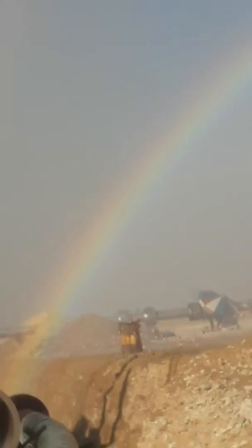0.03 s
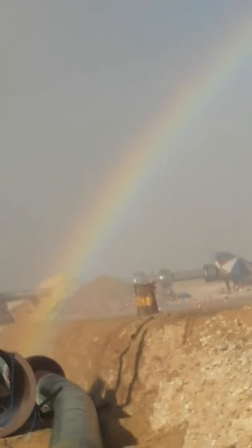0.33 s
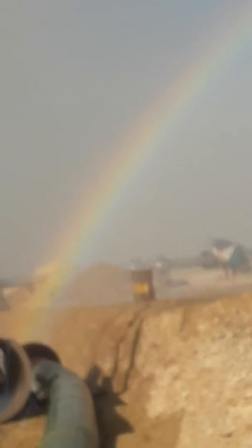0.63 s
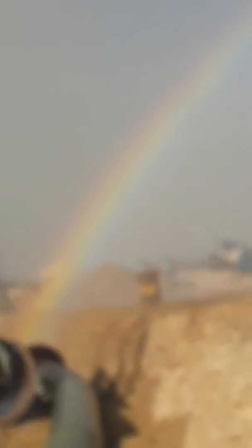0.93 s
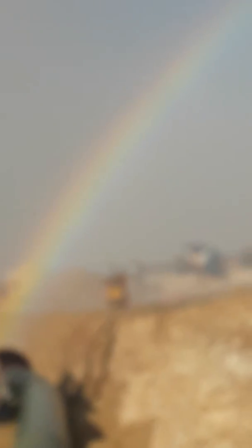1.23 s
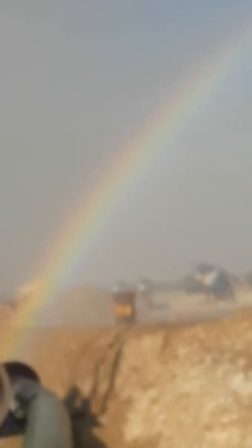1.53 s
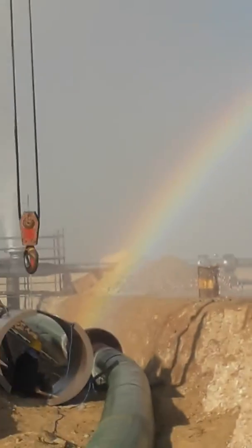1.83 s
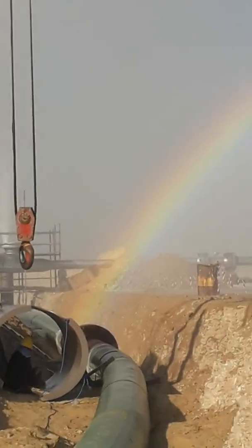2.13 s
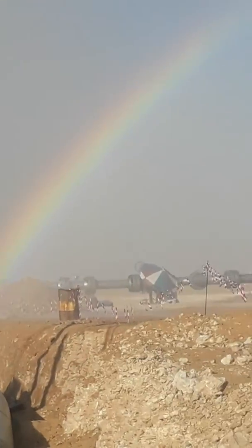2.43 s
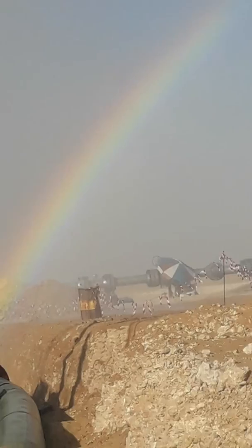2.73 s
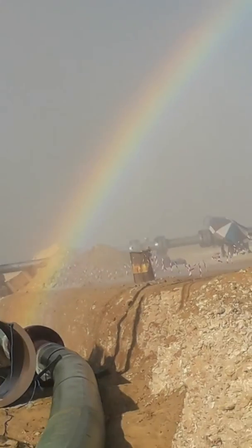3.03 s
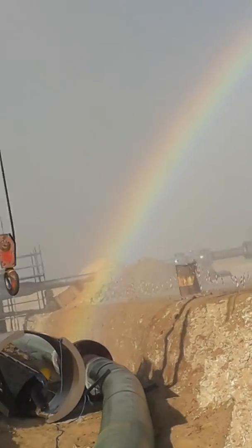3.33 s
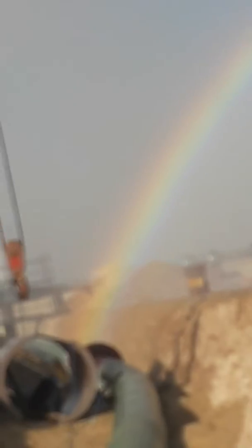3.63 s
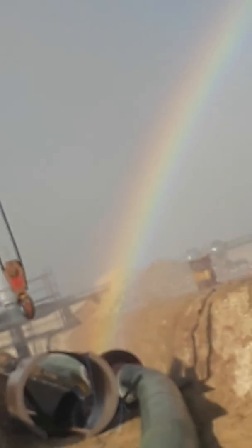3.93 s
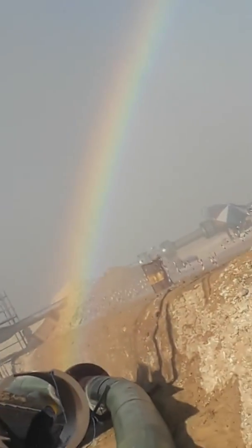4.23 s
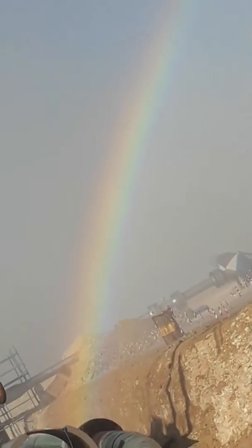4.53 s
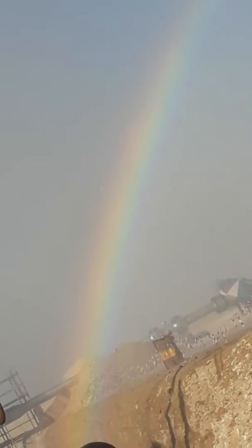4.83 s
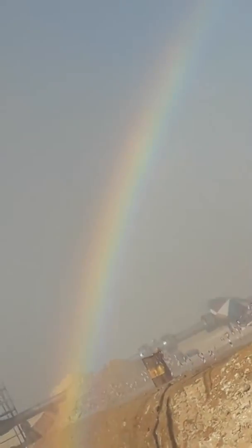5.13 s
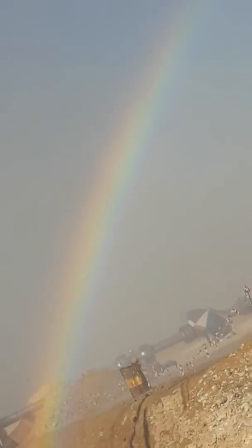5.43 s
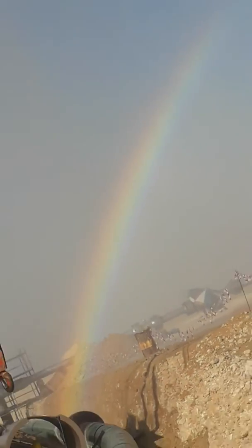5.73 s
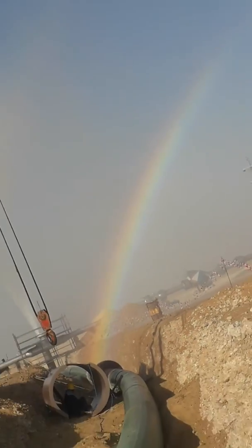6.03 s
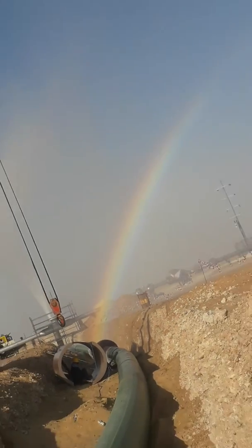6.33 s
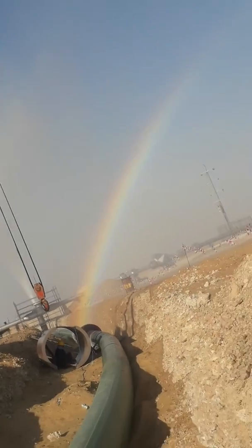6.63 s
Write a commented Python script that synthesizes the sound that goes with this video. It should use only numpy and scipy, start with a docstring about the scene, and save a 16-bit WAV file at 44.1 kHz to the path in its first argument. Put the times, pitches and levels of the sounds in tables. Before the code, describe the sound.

After a low breeze and one crackling gust, water rushes out of a large pipe, roaring and spraying at a building site.

```python
"""A breezy building site: wind rumbles on the microphone over a far drone and faint rustles.
At about 2.6 s a gust bangs and crackles on the microphone. Water trickles from a big pipe and bursts to
full flow at 3.3 s: a hollow roar over low churning, throbbing as slugs of water leave about 16 times a
second. The jet breaks into spray, whose hiss swells and thins; a few drops tick on the microphone,
and two airy puffs of mist pass near the end."""
import sys
import numpy as np
from scipy import signal
from scipy.fft import rfft, irfft
from scipy.io import wavfile
from scipy.ndimage import uniform_filter1d

SR = 44100
rng = np.random.default_rng(int(sys.argv[2]) if len(sys.argv) > 2 else 0)


def log_audio(samples):
    """Write samples as a 16-bit WAV file to the path given in sys.argv[1]."""
    # one column per channel
    frames = np.atleast_2d(samples).T
    # limit to full scale, then quantise
    limited = np.clip(frames, -1, 1)
    pcm = np.round(limited * 32767).astype(np.int16)
    wavfile.write(sys.argv[1], SR, pcm)


N = 299880
T = np.arange(N) / SR
HZ = np.fft.rfftfreq(N, 1 / SR)


# EQ of the hollow roar: (frequency [Hz], level [dB])
ROAR_EQ = [(350, -44.5), (640, -20.5), (750, -2), (850, 1.5), (1000, -3), (1120, -3.5), (1280, -15),
           (1500, -9), (1680, -10.5), (1870, -19), (2080, -16), (2650, -19), (3000, -29), (4500, -40.5),
           (9000, -82)]
# Bands of the roar, core first: (upper edge [Hz], surge share [dB/dB], lag [s], flutter [dB],
# extra fall in a weak flow [dB/dB], splash share [dB/dB])
ROAR_BANDS = [(1220, 0.94, 0.0075, 1.43, 0, 0), (1900, 0.37, 0.0082, 1.5, 0.3, 1.1),
              (9000, 0.62, 0.052, 1.26, .75, 0.71)]

def roar(roar_db, splash_db, surge_db, weak_below_db=-38):
    """The jet's hollow core speaks first and throbs most; its upper bands open as it breaks up."""
    rest, out = noise(ROAR_EQ), np.zeros(N)
    splatter = flutter(rate=130, depth_db=-0.9)
    for edge_hz, surge_share, lag, flutter_db, fall, splash_share in ROAR_BANDS:
        band = irfft(rfft(rest) / (1 + (HZ / edge_hz) ** 14), N)
        rest = rest - band
        flow_db = np.interp(T - lag, T, roar_db)
        muffle_db = fall * np.minimum(flow_db - weak_below_db, 0)
        level_db = flow_db + muffle_db + splash_share * splash_db + surge_share * surge_db
        out += band * amp(level_db) * splatter * flutter(rate=70, depth_db=flutter_db)
    return out


# Fader rides of the running jet: (time [s], roar [dB], extra splash [dB], churning [dB])
FLOW_RIDES = [(3.35, -31.5, 1.5, -38), (3.65, -31.5, 3.5, -39.5), (4.05, -29, -1.5, -35.5),
              (4.55, -30.5, -4.5, -34), (4.9, -30, -2.5, -35), (5.3, -33, 1, -36.5),
              (5.75, -30.5, -1.2, -34.5), (5.92, -38, 3, -37), (6.55, -31.5, -1, -35.5),
              (6.8, -35, -1, -36.5)]

def flow(trickle_s=2.88, trickle_db=-33, full_s=3.3025, roar_db_per_s=133, churn_db_per_s=84):
    """The water trickles, then opens quickly to full flow: roar, splash and churning in dB."""
    roar_db, splash_db, churn_db = curves(FLOW_RIDES)
    until_full = np.maximum(full_s - T, 0)
    lead_in_db = trickle_db - roar_db_per_s * np.maximum(trickle_s - T, 0)
    opening_db = np.maximum(-roar_db_per_s * until_full, lead_in_db)
    return roar_db + opening_db, splash_db, churn_db - churn_db_per_s * until_full


# Accents in the throb, from single slugs of water: (time [s], lift [dB])
SLUG_ACCENTS = [(3.811, 5.5), (3.859, 5.5), (3.921, 6), (3.981, 1.5), (4.168, 6.5), (4.243, 0),
                (4.343, 5.5), (4.524, 5.5), (4.646, 7), (4.707, 7.5), (4.896, 4.5), (5.116, 2), (5.358, 11),
                (5.412, 6), (5.477, 7.5), (5.542, 6), (5.721, 7.7), (5.79, 11), (6.086, 2.5), (6.294, 6.5),
                (6.482, 5.7)]

def surges(per_s=16.5, jitter=0.2006, typical_db=3, spread_db=0.7, width_s=.013):
    """Slugs of water lift the jet briefly, at an uneven pace; in dB about the local mean."""
    gaps, sizes = rng.standard_normal((160, 2)).T
    times = np.cumsum(1 + jitter * gaps) / per_s
    lift_db = np.zeros(N)
    for s, db in [*zip(times, typical_db + spread_db * sizes), *SLUG_ACCENTS]:
        near = slice(*np.searchsorted(T, [s - .06, s + .06]))
        bump_db = db * np.exp(-.5 * ((T[near] - s) / width_s) ** 2)
        lift_db[near] = np.maximum(lift_db[near], bump_db)
    mean_power = uniform_filter1d(amp(lift_db) ** 2, size=SR // 3)
    return lift_db - 10 * np.log10(mean_power)


# EQ of the water's low end: (frequency [Hz], level [dB])
CHURN_EQ = [(25, -43), (55, -24), (100, -2.5), (170, -0.5), (270, 0.5), (330, -4.5), (370, -1),
            (470, -10.5), (555, -3.5), (650, -16.5), (900, -31), (2000, -67.5)]

def churning(churn_db, surge_db):
    """Churning water puts weight under the roar and barely throbs."""
    return noise(CHURN_EQ) * amp(churn_db + 0.06 * surge_db) * flutter(rate=48, depth_db=-0.27)


# EQs of the spray's three layers, dark to bright: (frequency [Hz], level [dB])
HISS_EQ = [(1000, -20), (2200, 9), (3050, -6), (3500, 1.5), (4100, -7), (4420, 1), (4850, -3),
           (5300, -18.5), (5850, -9), (6500, -22), (9000, -46.5)]
SIZZLE_EQ = [(3000, -16), (4800, 4), (5800, 8), (6400, 1), (7200, -5.5), (7600, 4), (8400, -12),
             (9600, -24), (11000, -24.5), (16000, -30)]
MIST_EQ = [(8000, -27.5), (10500, -21.5), (11700, 0.5), (12800, 5), (14000, 0), (15700, 2)]
# Narrow rings in the spray: (frequency [Hz], width [Hz], gain [dB])
SPRAY_RINGS = [(3495, 35, 5.5), (4400, 24, 8.5), (5420, 22, 2.5), (5700, 22, 2), (5570, 22, 8),
               (5720, 16, 6.5), (5750, 40, -3.5), (5900, 24, 3), (5800, 24, 8.5), (6000, 63, 0.5),
               (6870, 35, 5.5), (11220, 160, 13)]
# The spray swells and thins: (time [s], strength [dB])
SPRAY_RIDE = [(3.2, -49), (3.3, -24), (3.42, -9), (3.6, -6.5), (3.76, -14), (3.95, -0.7), (4.4, -2.5),
              (4.6, -19), (4.78, -5.5), (5.02, -1), (5.55, 0.3), (5.8, -10.5), (6.04, -19.5), (6.36, -18.5),
              (6.55, -10.5), (6.8, -18)]

def spray(surge_db, formed_s=3.32, forming_db_per_s=114):
    """Countless drops merge into a hiss that trembles with the jet; as it thins, sizzle fades first."""
    rings_db = sum(db / (1 + (2 * (HZ - hz) / width) ** 2) for hz, width, db in SPRAY_RINGS)
    strength_db, = curves(SPRAY_RIDE)
    forming_db = -forming_db_per_s * np.maximum(formed_s - T, 0)  # the jet takes a moment to break up
    out = np.zeros(N)
    layers = (HISS_EQ, -44, 1, -6.5), (SIZZLE_EQ, -50, 1.28, -.3), (MIST_EQ, -63.5, 0.8, -.3)
    for eq, level_db, fade_ratio, full_at_db in layers:
        thinning_db = fade_ratio * np.minimum(strength_db - full_at_db, 0)
        out += pipe_echo(noise(eq, rings_db)) * amp(level_db + thinning_db)
    return out * amp(forming_db + 0.38 * surge_db) * flutter(rate=50, depth_db=0.38)


def pipe_echo(x, t60=0.13, wet_db=-13):
    """Dense short echoes from the steel pipe ripple the spectrum finely."""
    t = np.arange(SR // 4) / SR
    tail = rng.standard_normal(len(t)) * amp(-60 * t / t60)
    echo = signal.oaconvolve(x, tail / np.linalg.norm(tail))[:N]
    return unit(x + amp(wet_db) * echo)


# Wind thumps: (time [s], level [dB], extra pitch at the attack [Hz])
THUMP_CUES = [(.047, -29.5, 170), (1.874, -32, 150), (2.065, -35, 168), (2.138, -18.5, 340),
              (2.167, -28, 192), (2.6108, 1.5, 250), (2.803, -11.5, 205)]

def thumps(rise_s=0.0037, sag_s=0.0022, settle_hz=78, onset_turns=.33):
    """A blow of air swings the diaphragm once quickly, then once or twice slowly."""
    out, t = np.zeros(N), np.arange(SR // 10) / SR
    for s, db, extra_hz in THUMP_CUES:
        turns = np.cumsum(settle_hz + extra_hz * np.exp(-t / sag_s)) / SR
        push = np.sqrt(t / rise_s) * np.exp(.25 * (1 - (t / rise_s) ** 2))
        soft_start = 1 - np.exp(-(turns / onset_turns) ** 2)
        add(out, s, -amp(db) * push * soft_start * np.sin(2 * np.pi * turns))
    return out


# EQ of the buffeting: (frequency [Hz], level [dB])
GUST_EQ = [(20, -21.5), (60, -12.5), (120, 4.5), (250, -5), (400, -11.5), (600, -22), (900, -28.5),
           (1500, -40), (3000, -55), (5500, -64), (9000, -93), (16000, -69.5)]
# Gust hits: (time [s], hold [s], level [dB])
GUST_CUES = [(0.103, 0.029, -43), (0.82, 0.02, -45.5), (0.938, 0.024, -48.5), (2.515, .085, -34),
             (2.619, .13, -20), (2.781, 0.037, -15), (4.75, 0.036, -30.5), (5.106, 0.039, -30)]

def gusts():
    """Eddies buffet the microphone; their rough top rides on their own low swings."""
    force = np.max([amp(db) * swell(s, hold, rise_db_per_s=897, fall_db_per_s=478.5)
                    for s, hold, db in GUST_CUES], axis=0)
    buffet = noise(GUST_EQ)
    swing = irfft(rfft(buffet) / (1 + (HZ / 800) ** 6), N)  # lows under 800 Hz
    rough = (buffet - swing) * unit(amp(0.8 * np.clip(swing, -2, 2)))
    return force * (swing + rough)


# Four microphone crackles, then water drops, pre-EQ: (time [s], click [dB], low push [dB], centre [Hz])
TICK_CUES = [(2.6178, -13.5, -11, 1210), (2.676, -31, -35, 2200), (2.8065, -35, -26, 2200),
             (2.8394, -42, -21.5, 2420), (4.158, -15, -45, 4500), (4.1614, -9, -40, 5030),
             (5.027, -10, -47, 5900), (6.124, -11.5, -24, 1990), (6.143, -18, -25, 2800)]
# EQ over all the ticks: (frequency [Hz], gain [dB])
TICK_EQ = [(300, 4), (2500, 7), (5000, 4), (7500, -2), (10000, -20.5), (12500, -6), (16000, -9)]

def crackles_and_drops(width_octaves=1.0, push_s=.00085):
    """The microphone crackles in the strong gust; later, drops hit it. Each is a dry click and a push."""
    out = np.zeros(N)
    t, hz = np.arange(512) / SR, np.fft.rfftfreq(512, 1 / SR)
    age = t / push_s
    push = np.e * age * (1 - age / 2) * np.exp(-age)
    for s, click_db, push_db, centre_hz in TICK_CUES:
        spectrum = np.exp(-.5 * (np.log2((hz + 1) / centre_hz) / width_octaves) ** 2)
        click = np.fft.fftshift(irfft(spectrum))
        add(out, s - t[-1] / 2, amp(click_db) * click)
        add(out, s, -amp(push_db) * push)
    return colour(out, TICK_EQ)


# EQ of the wind bed: (frequency [Hz], level [dB])
BREEZE_EQ = [(20, -18.5), (40, -9), (70, 2), (110, -3.5), (170, -4.5), (250, -13.5), (400, -27.5),
             (600, -38), (1200, -54), (3000, -64.5)]
# Fader ride of the wind bed: (time [s], level [dB])
BREEZE_RIDE = [(.1, -42.5), (.4, -52), (.85, -45.5), (1.4, -50.5), (1.8, -50.5), (2.1, -41), (2.4, -47),
               (2.95, -47.5), (3.5, -53), (4.2, -47), (5.4, -44), (5.95, -57.5), (6.8, -54)]

def breeze():
    """Eddies at the microphone make a lumpy rumble."""
    level_db, = curves(BREEZE_RIDE)
    return noise(BREEZE_EQ) * amp(level_db) * flutter(rate=25, depth_db=3.0)


# EQs of the scuffing body and the airy top: (frequency [Hz], level [dB])
SCUFF_EQ = [(200, -5), (500, 9), (900, 6), (1400, -3), (2000, -10.5), (2900, -34), (6500, -41)]
AIR_EQ = [(1500, -18), (3000, -3), (4400, 3.5), (6000, -12), (10000, -21.5), (12000, -6), (16000, -1.5)]
# Five rustles, then two puffs of mist: (time [s], hold [s], scuff [dB], air [dB])
RUSTLE_AND_MIST_CUES = [(0.004, 0.11, -59, -72), (0.177, 0.076, -64.5, -100), (1.882, .03, -62.5, -78),
                        (2.14, .05, -65, -82), (2.249, .035, -74, -68.5), (6.013, .06, -81, -65),
                        (6.752, .04, -82, -60.5)]

def rustles_and_mist():
    """Faint rustles early on; two airy puffs of spray mist near the end."""
    scuff = noise(SCUFF_EQ) * flutter(rate=55, depth_db=2.5)
    air, out = noise(AIR_EQ), np.zeros(N)
    for s, hold, scuff_db, air_db in RUSTLE_AND_MIST_CUES:
        envelope = swell(s, hold, rise_db_per_s=302, fall_db_per_s=139)
        out += envelope * (scuff * amp(scuff_db) + air * amp(air_db))
    return out


# EQ of the distant ambience: (frequency [Hz], level [dB])
DRONE_EQ = [(200, -6), (580, -10.5), (740, 4.5), (850, 1), (1040, -20), (1280, -14), (1700, -26),
            (4400, -25.5), (6000, -29.5), (10000, -32.5), (15500, -28)]

def far_drone(level_db=-65.5):
    """The far site hums near 800 Hz over thin hiss."""
    return noise(DRONE_EQ) * amp(level_db)


def amp(db):
    return 10 ** (np.asarray(db) / 20)


def unit(x):
    return x / np.sqrt(np.mean(x ** 2) + 1e-20)


def curves(rows):
    """One automation curve for each column after the time."""
    times, *columns = np.transpose(rows)
    return [np.interp(T, times, column) for column in columns]


def colour(x, eq, extra_db=0):
    """Filters x through an EQ curve."""
    hz, db = np.transpose(eq)
    gain_db = np.interp(np.log(HZ + 1), np.log(hz), db) + extra_db
    return irfft(rfft(x) * amp(gain_db), N)


def noise(eq, extra_db=0):
    """Coloured noise of rms 1."""
    return unit(colour(rng.standard_normal(N), eq, extra_db))


def flutter(rate, depth_db):
    """A turbulent gain of mean power 1 that moves up to about rate times a second."""
    slow_band = np.exp(-(HZ / rate) ** 2) * (HZ > rate / 10)
    wander = unit(irfft(rfft(rng.standard_normal(N)) * slow_band, N))
    return unit(amp(depth_db * wander))


def swell(start, hold, rise_db_per_s, fall_db_per_s):
    """A gain that reaches 1 at start, holds and dies away."""
    before, after = np.maximum(start - T, 0), np.maximum(T - start - hold, 0)
    return amp(-rise_db_per_s * before - fall_db_per_s * after)


def add(mix, s, sound):
    part = mix[max(round(s * SR), 0):][:len(sound)]
    part += sound[:len(part)]


def scene():
    """The water layers share one throb; wind, ticks and the site surround them."""
    surge_db = surges()
    roar_db, splash_db, churn_db = flow()
    water = roar(roar_db, splash_db, surge_db) + churning(churn_db, surge_db) + spray(surge_db)
    wind = breeze() + gusts() + thumps()
    return (water + wind + crackles_and_drops() + far_drone() + rustles_and_mist())[None]


def record(dry, low_cut_hz=36, ceiling=1.06, high_cut_hz=15770):
    """The microphone sheds the deepest rumble, just overloads on the hardest blow and loses the top."""
    low_cut = signal.butter(3, low_cut_hz, "highpass", fs=SR, output="sos")
    high_cut = signal.firwin(1023, high_cut_hz, window=("kaiser", 9), fs=SR)
    heard = signal.sosfilt(low_cut, dry)
    clipped = heard / (1 + (heard / ceiling) ** 6) ** (1 / 6)
    return signal.oaconvolve(clipped, high_cut[None], "same")


dry = scene()
out = record(dry)
log_audio(out)
```